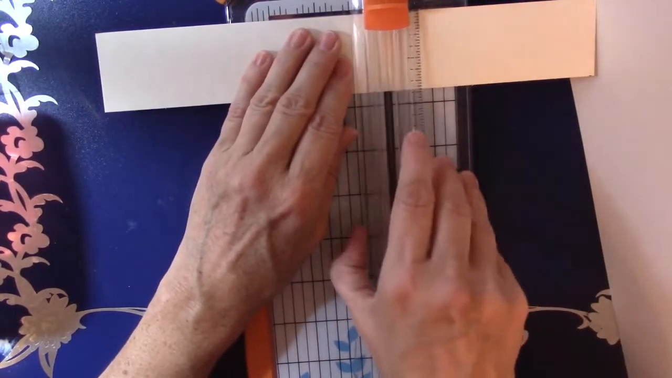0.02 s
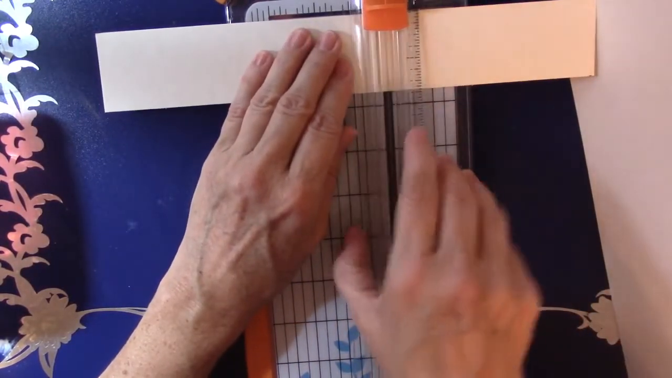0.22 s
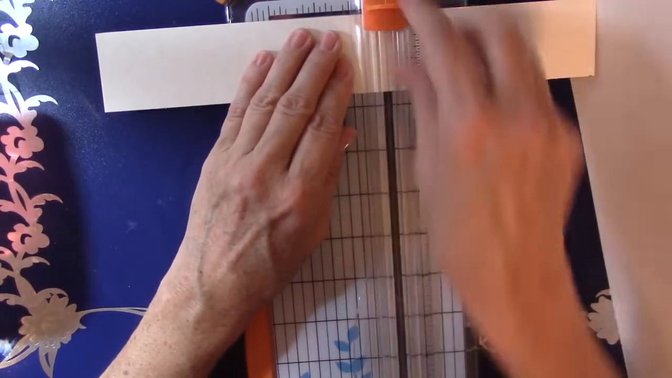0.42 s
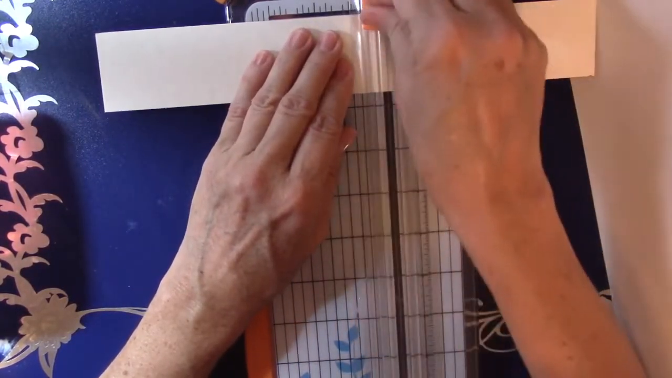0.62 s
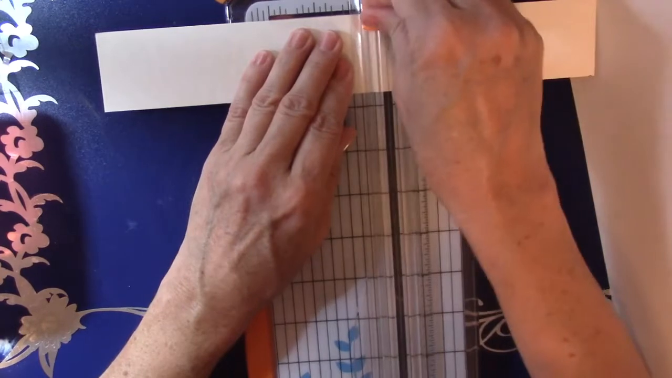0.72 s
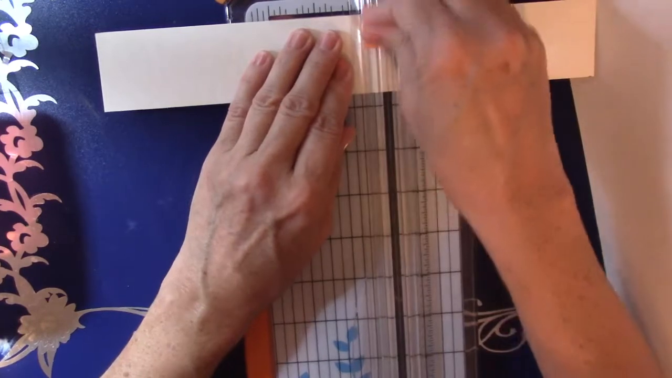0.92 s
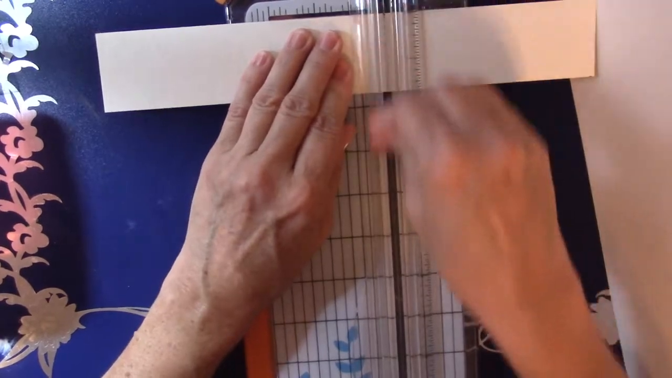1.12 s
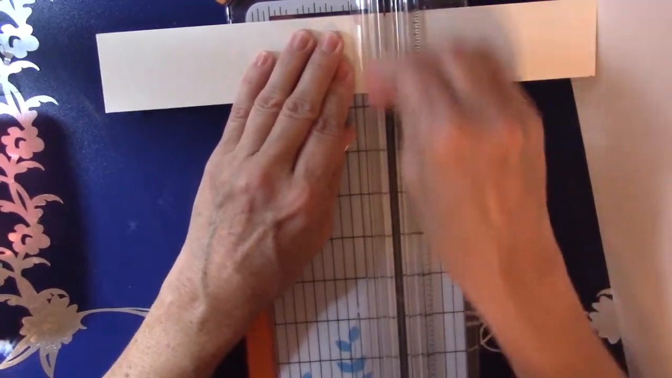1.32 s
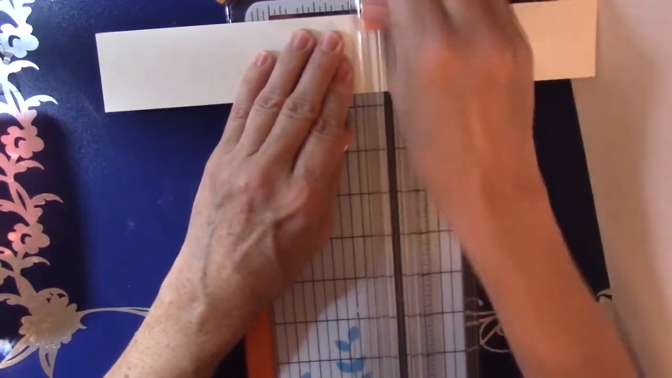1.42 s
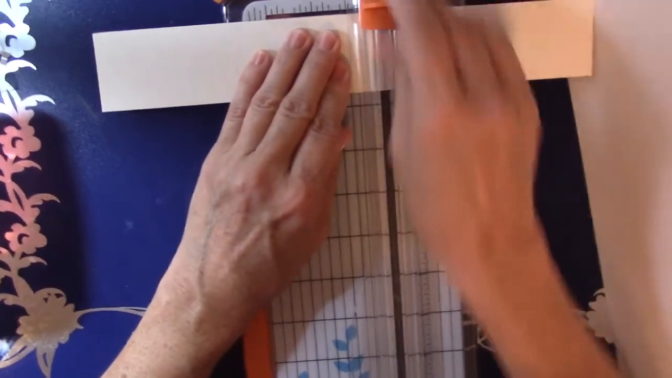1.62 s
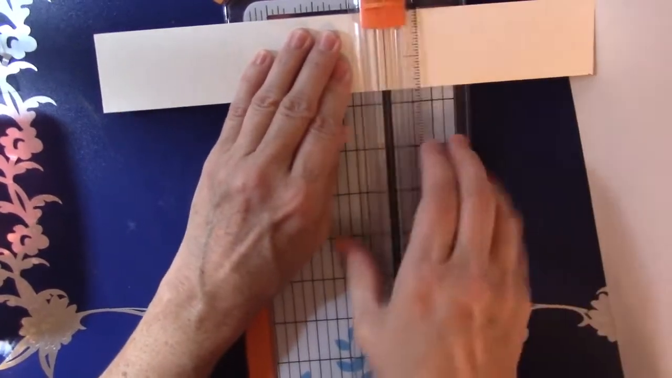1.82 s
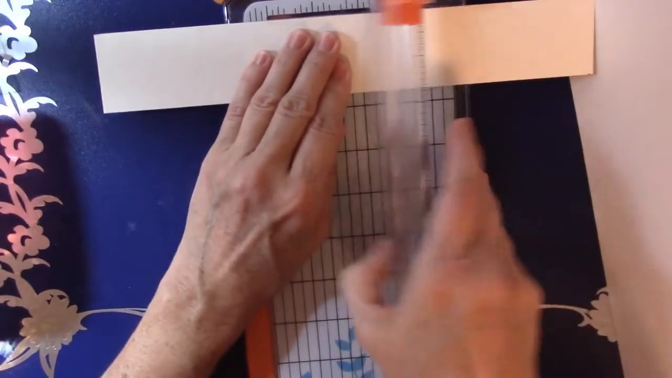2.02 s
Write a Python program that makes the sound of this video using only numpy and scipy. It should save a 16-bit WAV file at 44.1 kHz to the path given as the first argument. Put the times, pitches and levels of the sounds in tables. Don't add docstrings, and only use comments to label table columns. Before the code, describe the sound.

Paper trimmer close up: sharp plastic clack, short raspy cut through card, slide back, hard click.

```python
import sys
import numpy as np
from scipy import signal
from scipy.fft import rfft, irfft, next_fast_len
from scipy.io import wavfile
from scipy.ndimage import uniform_filter1d, map_coordinates

SR = 44100
rng = np.random.default_rng(int(sys.argv[2]) if len(sys.argv) > 2 else 0)


def nominal_scale(level):
    x = np.asarray(level, float) / 20
    return 10 ** x


def transcribe(u):
    v = np.clip(np.atleast_2d(u).T, -1, 1)
    q = np.round(v * 32767).astype(np.int16)
    wavfile.write(sys.argv[1], SR, q)


N = 92610

# (time [s], crack [dB], ring [dB], table thump [dB], optional ring centre [Hz])
GUARD_SLAPS = [(0.208, -5, -14, -31.5), (.2078, -6, -20.5, -41.5), (.2098, -11.5, -28, -63),
               (.2152, -10.5, -14.5, -58), (.2213, -7.5, -12.5, -57), (.2318, -12.5, -16.5, -49),
               (.238, -33, -17.5, -57), (0.27, -24, -18, -53), (0.29, -28, -29.5, -44.5),
               (.2708, -29, -33, -38.5), (0.2, -36, -38.5, -45), (0.1, -49, -43, -51),
               (0.3, -32, -34.5, -51, 600)]
# (time [s], crack [dB], ring [dB], table thump [dB], ring centre [Hz])
CARRIAGE_KNOCKS = [(.5526, -26, -34.5, -46, 1330), (.5555, -24, -31, -48, 950), (.56, -39, -37, -51, 1430),
                   (.567, -51, -41, -54, 475), (.5775, -46, -70, -54, 1200), (.642, -33.5, -53, -61, 1990),
                   (.861, -29.5, -47, -40, 1390), (1.066, -27.5, -33.5, -32, 560),
                   (1.2027, -38.5, -36, -58.5, 2140), (1.4249, -2.5, -20, -33.5, 1500),
                   (1.4264, -3.5, -19, -38.5, 900), (1.4405, -14.5, -27, -55.5, 590),
                   (1.4505, -31.5, -31, -55.5, 926), (1.473, -46, -42, -57.5, 647),
                   (1.7828, -33, -39, -34.5, 1017), (1.8164, -41.5, -44.5, -62, 850)]
# (time [s], ring [dB], table thump [dB], ring centre [Hz])
FINGER_TAPS = [(.029, -51, -64, 815), (0.5423, -41.5, -53, 740), (0.5459, -42, -76, 800),
               (.7675, -36.5, -58, 693), (.769, -47, -66, 1510), (1.2045, -30.5, -52.5, 915),
               (1.2055, -37, -61.5, 458), (1.523, -40.5, -60, 1420), (1.5289, -41, -62, 1090),
               (1.536, -42, -46, 725), (1.6178, -46.5, -50, 1280), (1.805, -39.5, -60.5, 960),
               (1.899, -47.5, -56, 850), (1.9751, -39, -68, 700), (1.986, -43.5, -53, 644),
               (1.998, -40, -49.5, 632), (2.024, -44.5, -55, 710)]
# (frequency [Hz], level [dB], t60 [s])
GUARD_MODES = [(346.5, -11, 0.12), (416, -10, 0.097), (490, -4.5, 0.044), (611, -2.5, 0.047),
               (800, -8, 0.03), (850, -2, 0.06), (899, 3, .07), (960, 4, .05), (1012, 4.5, 0.086),
               (1280, -4.5, .05), (1439, 2.5, 0.052), (1476, 3, 0.05), (1890, -4.5, 0.065),
               (2580, -1, 0.05)]
BASE_MODES = [(326.3, 8, 0.18), (426.5, 9.5, 0.065), (539, 5, 0.047), (619, -1, 0.08), (725.7, 1, 0.06),
              (912, -2, 0.04), (1002, 3, 0.034), (1083, -12.5, 0.081), (1360, -8, 0.029), (1464, -6, 0.05),
              (1784, 0, 0.023), (2140, -4, .04), (2695, -12, 0.024), (4200, -6, .015)]
TABLE_MODES = [(96, -10.5, 0.2), (130, -0.5, 0.2), (148, 1.5, 0.16), (178.4, 4, 0.083), (262, -13.5, 0.097)]
# (frequency [Hz], level [dB per Hz])
GUARD_CRACK = [(710, -54), (1200, -29), (2000, -10.5), (3000, -10.5), (4200, -5.5), (5350, -5.5),
               (7000, -9), (9000, -20.5), (15000, -43)]
BASE_CRACK = [(710, -44), (1200, -17.5), (1680, -3), (2680, -12.5), (4200, -4.5), (5500, -7.5), (8440, -15),
              (12500, -24), (16500, -40)]

# (time [s], level [dB])
CUT_PRESSURE = [(.78, -74), (.835, -60), (.858, -46), (.864, -35.5), (.9, -33), (.95, -30), (.985, -31.5),
                (1.02, -29.5), (1.068, -28.5), (1.079, -45.5)]
# (time [s], level [dB])
RUN_OUT_SPEED = [
    (1.08, -46.5),
    (1.15, -52.5),
    (1.18, -69.5),
]
BACK_SPEED = [
    (1.215, -59.5),
    (1.255, -49),
    (1.32, -44.5),
    (1.375, -43),
    (1.415, -45),
]
# (frequency [Hz], width [Hz], early in stroke [dB], midway [dB], late [dB])
RAIL_CUTTING = [(438.5, 21.4, 11, 13.5, 8.5), (700, 100, 4.5, 4.5, 8), (777, 79, 4.5, 3, 12),
                (1416, 106, 8, 11, 5.5), (1592, 65, 10.5, 6, 8.5), (1650, 54, -20, 2, 12.5),
                (1910, 90, 8.5, 2.5, 0), (2030, 47, -5, 1, 11), (3020, 240, -3.5, 2.5, 5),
                (3570, 83, 11, 11.5, 3), (4060, 37, 1, -2, 6.5), (5190, 120, 4, 12.5, 2),
                (6010, 220, -16, -15, 4.5), (6700, 150, -5, 8, -0.5), (7300, 180, 2, 8, -4)]
RAIL_FREE = [(1820, 110, 0, 4, 7), (3550, 94, 8.5, 5, 2), (5040, 250, -5, 3, 6.1), (7090, 160, 8.5, 10, 7),
             (8180, 300, 4.5, 2.5, 2), (9470, 480, -1, 0, 3)]
# (frequency [Hz], level [dB per Hz])
CARD_COLOUR = [(41, -45), (70, -17), (136, 0.5), (784, -14), (1170, -13), (1590, -13), (7690, -19.5),
               (12500, -26.5), (15000, -39.5)]
GLIDE_COLOUR = [(150, -42.5), (250, -19.5), (450, 1.5), (1700, -3), (3010, -7.5), (5130, -4.5),
                (15500, -17)]

# (length [s], level [dB], width [log pitch])
BRUSH_TIMES = [.193, .8, 1.175, 1.235, 1.56, 1.55, 1.86, 1.897, 1.9, 1.89, 2.045, 2.1, 2.09]
BRUSH_COLOURS = [6500, 900, 130, 135, 9000, 145, 500, 6950, 5300, 7500, 8000, 1000, 6000]
BRUSH_SHAPES = [(.015, -59, 0.37), (0.11, -57.5, 0.65), (0.018, -46, 0.2), (0.019, -46, .15),
                (0.023, -56.5, 0.17), (0.029, -54.5, 0.17), (0.27, -59, 1), (0.023, -56.5, 0.035),
                (0.022, -64, 0.04), (0.042, -62, 0.32), (0.014, -55.5, 0.19), (0.084, -52, 0.58),
                (.1, -57, 0.62)]

# (frequency [Hz], t60 [s])
ROOM_DECAY = [(150, 0.62), (1500, 0.33), (12000, 0.21)]
# (frequency [Hz], level [dB per Hz])
AIR_COLOUR = [(35, -48.5), (60, -14.5), (250, -3), (1180, -19), (1820, -18.5), (7430, -29.5),
              (10500, -52.5), (15000, -59), (22000, -120)]
# (frequency [Hz], level [dB])
SIDE_COLOUR = [(100, -17), (1000, -12), (8000, -11.5)]

SNAP_RISE_S, SNAP_T60_S = 0.0002, 0.0077
SHIVER_T60_S, SHIVER_DB = 0.042, -13
RATTLE_T60_S, RATTLE_WIDTH = 0.071, 0.62
TREMBLE = 0.08
KNOCK_SPREAD, TAP_SPREAD = 0.31, 0.27
PATCH_DB = 1.5
WET_DB, WET_SIDE_DB = -17, 2
AIR_DB, AIR_SIDE_DB = -58.5, 6
LAG_S = 8e-6
LOW_HZ, TOP_HZ = 58, 16000
GAP_S, GAP_LENGTH_S, GAP_FADE_S = 1.4153, 0.0052, 0.00072
PEAK = 1.1


def unit(x):
    return x / np.sqrt(np.mean(x ** 2) + 1e-20)


def along(points, hz):
    f, v = np.transpose(points)
    return np.interp(np.log(hz + 1), np.log(f + 1), v)


def wobble(rate):
    knots = rng.standard_normal(int(N * rate / SR) + 4)
    return map_coordinates(knots, [np.arange(N) * rate / SR])


def filtered(x, response):
    n = x.shape[-1]
    m = next_fast_len(n + 8192)
    return irfft(rfft(x, m) * response(np.fft.rfftfreq(m, 1 / SR)), m)[..., :n]


def coloured(x, spectrum):
    return unit(filtered(x, lambda hz: nominal_scale(along(spectrum, hz))))


def bell(centre_hz, width):
    return lambda hz: np.exp(-0.5 * (np.log((hz + 1) / centre_hz) / width) ** 2)


def ring(modes, t, attack, centre_hz, spread):
    hz, db, t60 = np.transpose(modes)[..., None]
    level_draw, tuning_draw = rng.standard_normal((2, len(modes), 1))
    wander = np.cumsum(rng.standard_normal((len(modes), len(t))), axis=1)
    tremble = wander * np.sqrt(hz * TREMBLE / SR)
    size = nominal_scale(db + 2 * level_draw) * np.exp(-0.5 * (np.log(hz / centre_hz) / spread) ** 2)
    phase = 2 * np.pi * hz * (1 + 0.0039 * tuning_draw) * t + tremble
    x = size * nominal_scale(-60 * t / t60) * np.sin(phase)
    return x.sum(axis=0) * (1 - np.exp(-t / attack)) / np.linalg.norm(size)


def hits(rows, modes, colour, spread, crack_db, ring_db, rattle_db, thump_db):
    out = np.zeros(N + SR)
    t = np.arange(SR // 4) / SR
    for s, crack, body, thump, *hz in rows:
        centre = hz[0] if hz else 1000
        snap_decay = nominal_scale(-60 * t / SNAP_T60_S) + nominal_scale(SHIVER_DB - 60 * t / SHIVER_T60_S)
        snap = coloured(rng.standard_normal(len(t)), colour) * snap_decay * (1 - np.exp(-t / SNAP_RISE_S))
        rattle = unit(filtered(rng.standard_normal(len(t)), bell(centre, RATTLE_WIDTH)))
        rattle = rattle * nominal_scale(rattle_db - 60 * t / RATTLE_T60_S) * (1 - np.exp(-t / 0.0024))
        part = ring(modes, t, 0.00086, centre, spread) + rattle
        table = ring(TABLE_MODES, t, 0.0037, 140, 2)
        hit = nominal_scale(crack + crack_db) * snap + nominal_scale(body + ring_db) * part + nominal_scale(thump + thump_db) * table
        out[round(s * SR):][:len(t)] += hit
    return out[:N]


def guard_slaps():
    return hits(GUARD_SLAPS, GUARD_MODES, GUARD_CRACK, 1.5,
                crack_db=-6.0, ring_db=0.38, rattle_db=-13.5, thump_db=-0.8)


def carriage_knocks():
    return hits(CARRIAGE_KNOCKS, BASE_MODES, BASE_CRACK, KNOCK_SPREAD,
                crack_db=-5.5, ring_db=5.75, rattle_db=-10, thump_db=2.7)


def patchy(x):
    z = signal.stft(x, nperseg=512)[2]
    field = uniform_filter1d(rng.standard_normal(z.shape), 5, 0)
    field = uniform_filter1d(field, 5, 1)
    return signal.istft(z * nominal_scale(PATCH_DB * unit(field)), nperseg=512)[1][:N]


def rasp(curve, spectrum, peaks, stages_s, grit_db, flutter_db):
    t = np.arange(N) / SR
    grit = grit_db * (wobble(900) + 0.34 * wobble(250))
    slips = patchy(rng.standard_normal(N)) * nominal_scale(grit)

    def rail(column):
        def response(f):
            total = 1
            for row in peaks:
                hz, width = row[:2]
                total = total + nominal_scale(row[column]) * 1j * f * width / (hz ** 2 - f * f + 1j * f * width)
            return total
        return response

    stroke = np.zeros(N)
    for k, share in enumerate(np.eye(len(stages_s))):
        stage = coloured(filtered(slips, rail(2 + k)), spectrum)
        stroke += stage * np.interp(t, stages_s, share)
    s, db = np.transpose(curve)
    level = np.interp(t, [s[0] - 0.02, *s, s[-1] + 0.004], [-110, *db, -110])
    flutter = flutter_db * (wobble(68.9) + wobble(25))
    return unit(stroke) * nominal_scale(level + flutter)


def card_cut():
    return rasp(CUT_PRESSURE, CARD_COLOUR, RAIL_CUTTING, (0.89, 0.96, 1.02), grit_db=1.5, flutter_db=0.0)


def run_out():
    return rasp(RUN_OUT_SPEED, GLIDE_COLOUR, RAIL_FREE, (1.5, 1.6, 1.7), grit_db=0, flutter_db=1.5)


def slide_back():
    return rasp(BACK_SPEED, GLIDE_COLOUR, RAIL_FREE, (1.27, 1.33, 1.39), grit_db=1.3, flutter_db=0.0)


def finger_taps():
    rows = [(s, -np.inf, *rest) for s, *rest in FINGER_TAPS]
    return hits(rows, BASE_MODES, BASE_CRACK, TAP_SPREAD,
                crack_db=0, ring_db=6.17, rattle_db=-16, thump_db=2.9)


def skin_brushes():
    t = np.arange(N) / SR
    out = np.zeros(N)
    for s, hz, (length, db, width) in zip(BRUSH_TIMES, BRUSH_COLOURS, BRUSH_SHAPES):
        swell = nominal_scale(db + wobble(70)) * np.exp(-0.5 * (2 * (t - s) / length) ** 2)
        out += swell * unit(filtered(rng.standard_normal(N), bell(hz, width)))
    return out


def room(x):
    out = np.zeros((2, N + SR))
    step, delay = SR // 4, 200
    for i in range(0, N, step):
        hz, t, z = signal.stft(rng.standard_normal((2, SR // 2)), SR, nperseg=256)
        decay = nominal_scale(-60 * t / along(ROOM_DECAY, hz)[:, None])
        tail = signal.istft(z * decay, SR, nperseg=256)[1]
        wet = signal.fftconvolve(x[None, i:i + step], tail / np.linalg.norm(tail[0]), axes=1)
        start = i + delay
        out[:, start:start + wet.shape[1]] += wet[:, :N + SR - start]
    return out[:, :N] * nominal_scale([[WET_DB], [WET_DB + WET_SIDE_DB]])


def air():
    tone = coloured(rng.standard_normal((2, N)), AIR_COLOUR)
    return tone * nominal_scale([[AIR_DB], [AIR_DB + AIR_SIDE_DB]]) * nominal_scale(0.6 * wobble(9))


def scene():
    near = guard_slaps() + carriage_knocks() + card_cut() + run_out() + slide_back()
    near = near + finger_taps() + skin_brushes()
    mid, side = room(near) + air()
    side = filtered(side, lambda hz: nominal_scale(along(SIDE_COLOUR, hz)))
    side = side + filtered(near, lambda hz: 0.012 + 1j * np.pi * hz * LAG_S)
    return np.array([mid + near + side, mid + near - side])


def roll_off(x):
    return signal.sosfilt(signal.butter(12, 16820, fs=SR, output="sos"), x)


def record(dry):
    t = np.arange(N) / SR

    def microphone(f):
        low = 1j * f / LOW_HZ
        return (low / (1 + low)) ** 3 / (1 + (f / TOP_HZ) ** 40)

    heard = filtered(dry, microphone)
    outside_gap_s = np.maximum(GAP_S - t, t - GAP_S - GAP_LENGTH_S)
    gate = np.clip(outside_gap_s / GAP_FADE_S, 0, 1)
    mix = PEAK * np.tanh(heard * gate / PEAK)
    return roll_off(mix)


dry = scene()
out = record(dry)
transcribe(out)
```